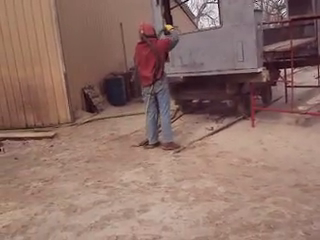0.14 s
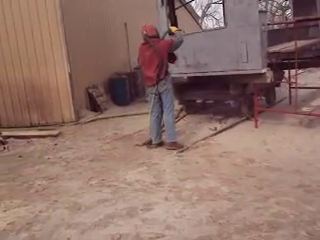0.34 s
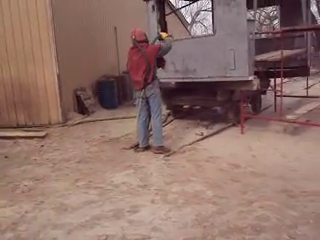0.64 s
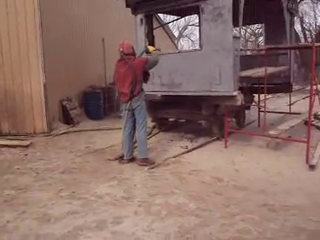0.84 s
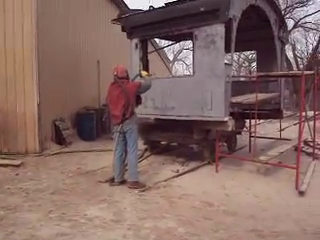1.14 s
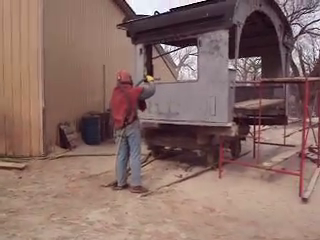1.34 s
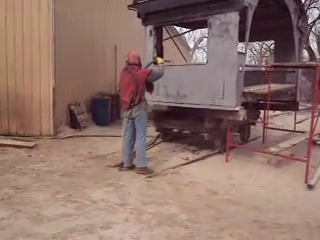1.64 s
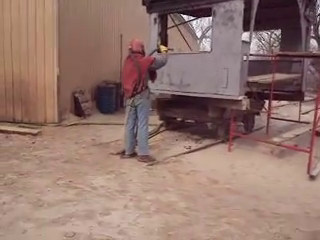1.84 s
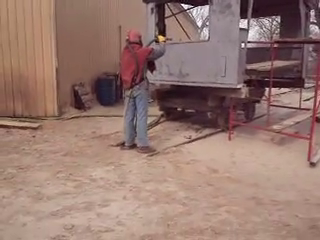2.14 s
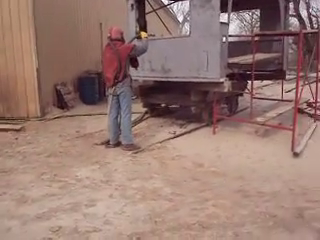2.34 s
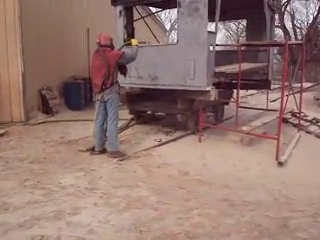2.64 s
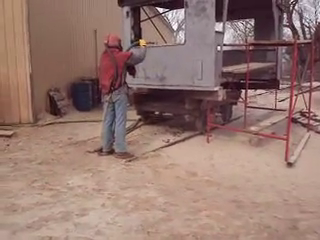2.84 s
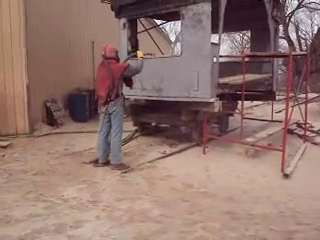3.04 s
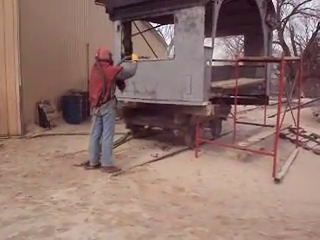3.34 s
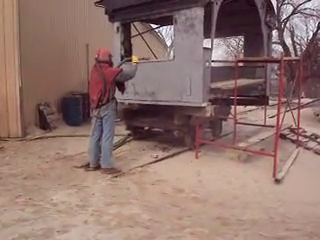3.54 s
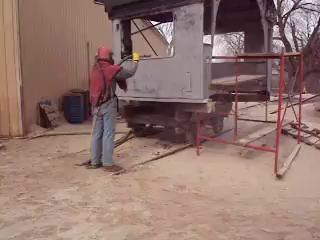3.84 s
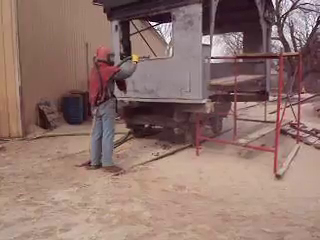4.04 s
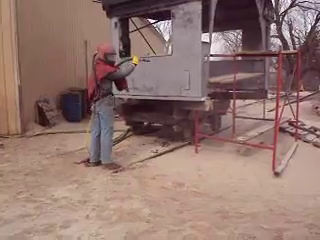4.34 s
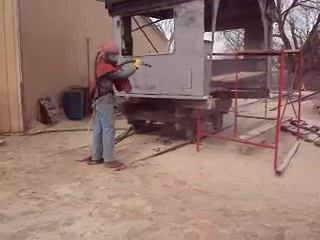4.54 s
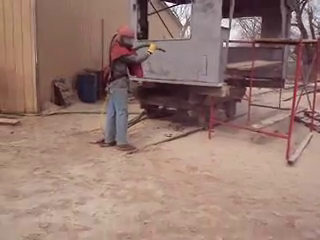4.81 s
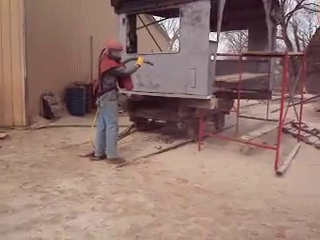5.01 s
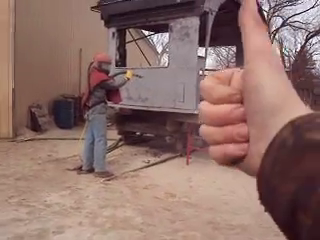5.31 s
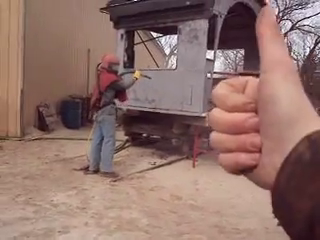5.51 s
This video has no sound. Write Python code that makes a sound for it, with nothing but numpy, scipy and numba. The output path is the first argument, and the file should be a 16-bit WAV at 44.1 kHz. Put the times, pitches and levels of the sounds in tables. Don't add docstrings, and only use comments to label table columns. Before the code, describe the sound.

A loud steady sandblasting jet hisses and roars outdoors, its grit ringing a hollow steel cabin, through a rough, overdriven small microphone.

```python
import sys
import numpy as np
from scipy import signal
from scipy.io import wavfile
from scipy.ndimage import uniform_filter1d
from numba import njit

SR = 44100
rng = np.random.default_rng(int(sys.argv[2]) if len(sys.argv) > 2 else 0)


def voltage_ratio(decibels):
    exponent = np.asarray(decibels, float) / 20
    return 10 ** exponent


def dump_mix(stems):
    frames = np.atleast_2d(stems).T
    limited = np.clip(frames, -1, 1)
    pcm = np.round(limited * 32767).astype(np.int16)
    wavfile.write(sys.argv[1], SR, pcm)


N = 250047

# (time [s], peak level [dB], fall to either side [dB per s])
GUSTS = [
    (3.76, -42.5, 86),
    (3.93, -29, 202),
    (4.36, -37.5, 73.5),
    (4.7, -32, 63),
    (4.83, -39.5, 229),
    (4.94, -30.5, 88),
    (5.2, -35.5, 22),
    (5.67, -32.5, 36.5),
]
# (time [s], peak level [dB], length [s])
THUMPS = [
    (4.8097, -2, .0019),
]
# (time [s], strength [dB])
NEGATIVE_SPIKES = [(0.0004, -49), (2.4533, -25.5), (2.7362, -41.5), (3.4426, -23.5), (3.462, -35),
                   (3.5753, -41.5), (3.6057, -32), (3.7768, -26.5), (3.8866, -24), (3.9025, -28.5),
                   (3.9394, -35), (4.1365, -19), (4.2338, -39), (4.2747, -26.5), (4.4338, -26), (4.4707, -33),
                   (4.4882, -21.5), (4.6573, -37), (4.6753, -30), (4.794, -21), (4.9407, -31), (4.9945, -31),
                   (5.1013, -33), (5.2185, -37), (5.2729, -37.5), (5.5393, -38)]
# (time [s], drive [dB], reach into the cabin [dB], hardness of the spot [dB],
# aim [0 = left end, 1 = right end])
GRIT_STREAM = [(0, -13.5, -6.5, -16, -0.89), (.08, -24.5, -19, -4, 0.35), (.3, -20.5, -4, -7.5, 0.19),
               (.36, -37.5, -14, 4, .1), (.54, -19.5, -7.5, -10, -0.17), (.9, -21, -5.5, -5, 0.088),
               (1.05, -21.5, -3.5, -4, 0), (1.28, -28, -0.5, -0.5, 0.09), (1.6, -22.5, -1, -3.5, 0),
               (2.76, -18.5, -1, -2.5, -0.12), (3.4, -21.5, 1, -1, 0.075), (3.62, -18.5, -3, -1, 0),
               (3.87, -19.5, 2.5, 0.5, -0.14), (4.38, -18.5, -4.5, 0.5, 0.012), (4.6, -18, -12.5, -3, 0.49),
               (4.8, -17.5, -12, -1, 0.99), (5.12, -24, -9, 2, 1), (5.67, -21, -14, 1.5, 0.96)]
# (pitch at left end [Hz], pitch at right end [Hz], width [Hz], level [dB],
# share of reach [ratio], share of hardness [ratio])
CABIN_RINGS = [
    (339.8, 385, 86.4, -2.5, 1, 0),
    (813.4, 990, 159, -1.5, 0.024, 0.27),
    (1284, 1400, 135, -3, 0.018, 0.64),
    (1570, 1850, 123, -3.5, 0.15, 2.22),
]
# (time [s], hiss level [dB], top of the hiss over its body [dB])
JET_COURSE = [(0, -24, -6.5), (.3, -24.5, -5.5), (.5, -22.5, -14.5), (1.1, -21.5, -12.5), (1.6, -21, -10.5),
              (2, -21, -12.5), (2.8, -21, -16), (3.2, -22, -12.5), (3.6, -24.5, -7), (3.83, -21, -5.5),
              (4.1, -24.5, -4.5), (4.3, -18.5, -6), (4.55, -21.5, -4.5), (4.8, -17.5, -8), (5.1, -20.5, -6),
              (5.25, -19.5, -4), (5.45, -21.5, -7), (5.67, -21.5, -8)]
# (pitch [Hz], level [dB per Hz])
JET_SPECTRUM = [(40, -35.5), (90, -15), (160, -7), (240, -14.5), (480, -8), (900, -6.5), (1300, -9),
                (1750, -11), (2600, -11), (3400, -9.5), (4000, -8.5), (4600, -17), (5000, -19.5),
                (5700, -15.5)]
# (start [s], length [s], pitch [Hz], level over the hiss [dB])
ECHO_RIDGES = [(-.1, 0.52, 3030, -7), (-.1, 0.48, 3760, -4), (.3, 0.72, 3820, -11.5),
               (0.29, 1.5, 4194, -11), (1.452, 0.62, 3010, -9.5), (3.105, 1.2, 1145, -3.5),
               (1.3, 0.76, 2203, -9.5), (1.4, 1, 3480, -10), (-.1, 0.41, 2010, -9.5), (2.11, .8, 1960, -10),
               (2.313, 1.2, 3083, -5), (2.302, 1.05, 4000, -12.5), (2.4, 1.3, 5510, -15.5),
               (2.894, .7, 1910, -4), (3.209, 1.3, 4376, -10.5), (3.386, 1.2, 2607, -7),
               (3.5, 1.1, 3164, -3), (3.497, .9, 3734, -4.5), (3.495, .9, 1867, -6),
               (4.301, 0.48, 2970, -3), (4.599, 0.41, 4280, -5), (4.453, 0.46, 3800, -3),
               (4.607, 0.47, 2650, -7.5), (4.704, .55, 3486, -7.5), (4.697, 1.1, 4936, -9.5),
               (4.701, 1.1, 5340, -8.5), (4.998, 0.28, 4134, -6), (5.196, .6, 3597, -5),
               (5.298, 0.37, 3810, -3.5), (5.047, .7, 2063, -7.5)]
# (start [s], length [s], pitch [Hz], depth [0-1])
ECHO_HOLLOWS = [(0.208, 1.3, 4320, 1), (.3, 1.2, 2660, 1), (.5, 1.05, 1605, 0.6), (1.4, 1.1, 3240, 0.3),
                (1.696, 1.4, 4570, 0.2), (1.999, 1.05, 2600, 0.8), (2.197, 1.3, 1793, 0.9),
                (2.503, 0.87, 2085, 0.3), (3.402, 0.74, 1346, 0.6), (2.997, 0.97, 4130, .4),
                (3.3, 1.1, 2130, .65), (3.493, 0.32, 2444, .4), (3.6, 0.88, 3825, 0.8),
                (4.708, 0.3, 2306, 0.3), (4.65, .3, 4270, .75), (4.686, 1.1, 5310, 0.3),
                (4.2, .35, 4850, .5), (4.996, .8, 4580, 0.9), (5.044, 0.64, 1654, 0.4),
                (5.105, .7, 2970, 0.3)]


def set_level(x, db):
    return x * voltage_ratio(db) / np.sqrt(np.mean(x ** 2))


def curves(table):
    times, *columns = np.transpose(table)
    return [np.interp(np.arange(N) / SR, times, column) for column in columns]


def walk(rate):
    hold = int(SR / rate)
    steps = np.repeat(rng.standard_normal(N // hold + 1), hold)
    smooth = uniform_filter1d(uniform_filter1d(steps, hold), hold)
    return 0.62 * smooth[:N]


def spell(start, length):
    fade = 0.32
    t = np.arange(N) / SR - start
    return np.clip(np.minimum(t, length - t) / fade + .5, 0, 1)


@njit
def moving_resonance(x, hz, width):
    y, band, low = np.empty(len(x)), 0., 0.
    for i in range(len(x)):
        g = np.tan(np.pi * hz[i] / SR)
        damping = width / hz[i]
        v = (band + g * (x[i] - low)) / (1 + g * (g + damping))
        band = 2 * v - band
        low = low + 2 * g * v
        y[i] = damping * v
    return y


def ring(hz, width, flicker_db, drift):
    centre = hz * (1 + drift * walk(3.12))
    once = moving_resonance(rng.standard_normal(N), centre, 1.65 * width)
    tone = moving_resonance(once, centre, 1.65 * width)
    return set_level(tone, 0) * voltage_ratio(flicker_db * walk(9))


def hump(start, length):
    t = np.arange(N) / SR
    return np.sin(np.pi * np.clip((t - start) / length, 0, 1))


def wind():
    t = np.arange(N) / SR
    gust_db = np.max([db - fall * np.abs(t - time) for time, db, fall in GUSTS], axis=0)
    dull = signal.butter(2, [15, 95], "band", fs=SR, output="sos")
    buffet = signal.sosfilt(dull, rng.standard_normal(N))
    return set_level(buffet, -1.7) * voltage_ratio(gust_db)


def thumps():
    return sum(voltage_ratio(db) * hump(time, length) for time, db, length in THUMPS)


def negative_spikes():
    strength_share, length = .25, .0003
    return -sum(voltage_ratio(4 + strength_share * db) * hump(time, length) for time, db in NEGATIVE_SPIKES)


def steel():
    drive_db, reach_db, hard_db, aim = curves(GRIT_STREAM)
    out = 0
    for left, right, width, db, deep, hard in CABIN_RINGS:
        loudness = voltage_ratio(drive_db + db + deep * reach_db + hard * hard_db)
        pitch = left + aim * (right - left)
        out = out + loudness * ring(pitch, 1. * width, flicker_db=1.5, drift=.01)
    return out


def roar(top_db):
    colour_hz, colour_db = np.transpose(JET_SPECTRUM)
    out = 0
    for hz in 55 * 2 ** np.arange(0, 6.8, 1 / 4):
        band = ring(hz, hz / 6, flicker_db=1.5, drift=0.0061)
        db = np.interp(np.log(hz), np.log(colour_hz), colour_db) + 10 * np.log10(hz / 1000)
        bright = np.clip(np.log2(hz / 3900) * 4, 0, 1)
        out = out + band * voltage_ratio(db + bright * (top_db - top_db.mean()))
    return set_level(out, 2.27)


def ridges():
    slide, width = 0.096, 146.
    aim = curves(GRIT_STREAM)[-1]
    out = 0
    for start, length, hz, db in ECHO_RIDGES:
        heard = spell(start, length)
        usual_aim = np.average(aim, weights=heard)
        pitch = hz * (1 + slide * (aim - usual_aim))
        out = out + voltage_ratio(db) * heard * ring(pitch, width, flicker_db=1.5, drift=.006)
    return out


def jet():
    hiss_db, top_db = curves(JET_COURSE)
    surge_db = 0.93 * walk(11)
    return (roar(top_db) + ridges()) * voltage_ratio(hiss_db + surge_db)


def hollow_out(sound):
    width = 186.
    for start, length, hz, depth in ECHO_HOLLOWS:
        band = moving_resonance(sound, np.full(N, 1. * hz), width)
        sound = sound - np.clip(depth, 0, 1) * spell(start, length) * band
    return sound


def scene():
    sound = hollow_out(jet() + steel())
    bass_cut = signal.butter(2, 62, "high", fs=SR, output="sos")
    sound = signal.sosfilt(bass_cut, sound)
    return (sound + wind() + thumps() + negative_spikes())[None]


def band_limit(x):
    return signal.sosfilt(signal.butter(12, 15880, fs=SR, output="sos"), x)


def record(dry):
    squash, offset = 1.24, .0072
    converter_top, player_top, slower = .7, .73, 4
    squashed = (1 - np.exp(-squash * dry)) / squash
    capacitor = signal.butter(2, 90, "high", fs=SR, output="sos")
    x = dry + signal.sosfilt(capacitor, squashed - dry) + offset
    x = np.clip(x[:, ::slower], -converter_top, converter_top)
    smooth = signal.firwin(137, 1 / slower, window=("kaiser", 8.5))
    x = signal.resample_poly(x, slower, 1, axis=1, window=smooth)[:, :N]
    x = np.clip(x, -player_top, player_top)
    return band_limit(x)


dry = scene()
out = record(dry)
dump_mix(out)
```